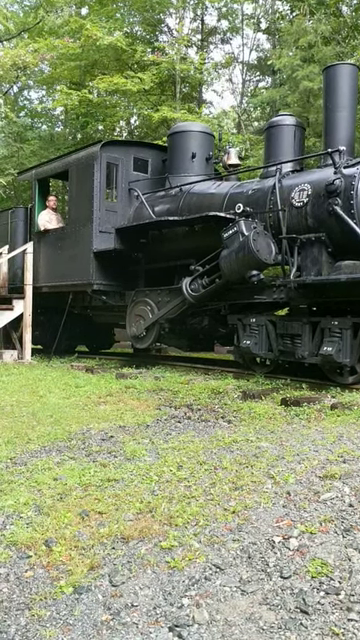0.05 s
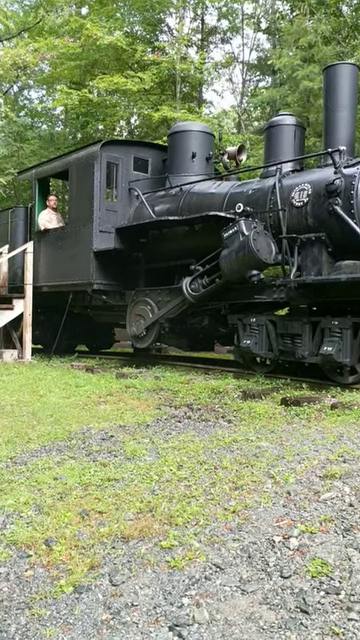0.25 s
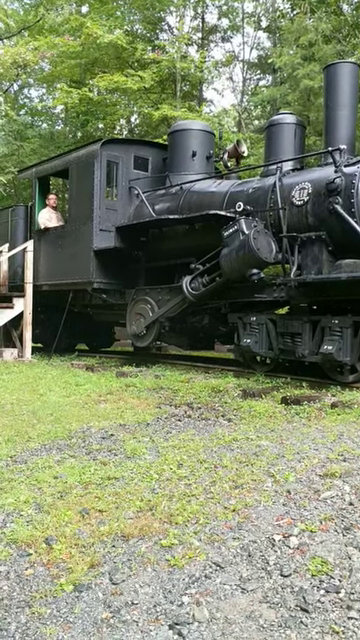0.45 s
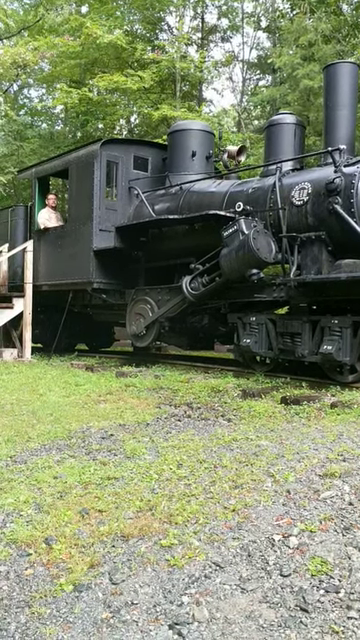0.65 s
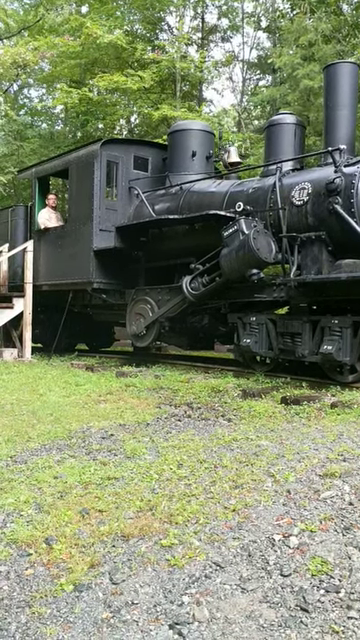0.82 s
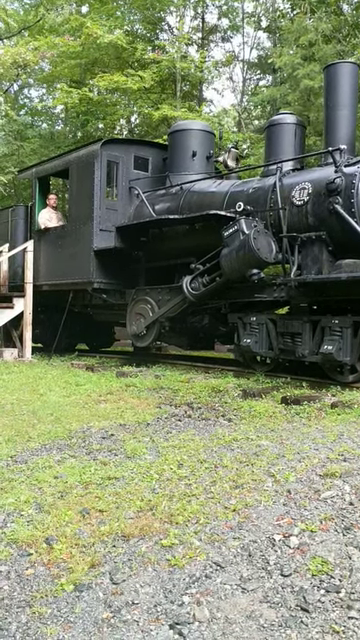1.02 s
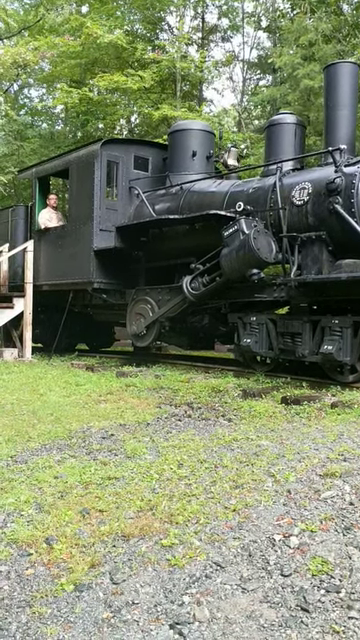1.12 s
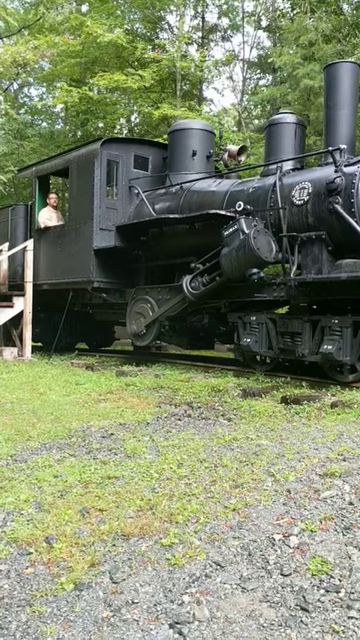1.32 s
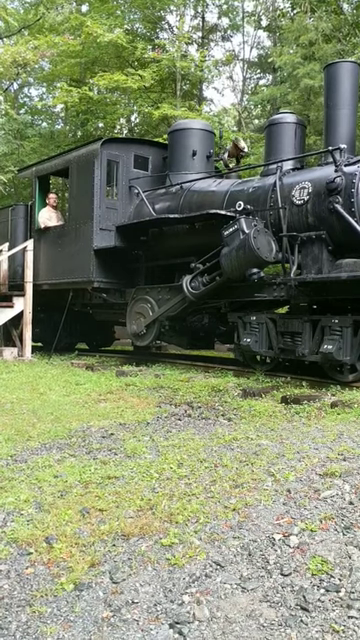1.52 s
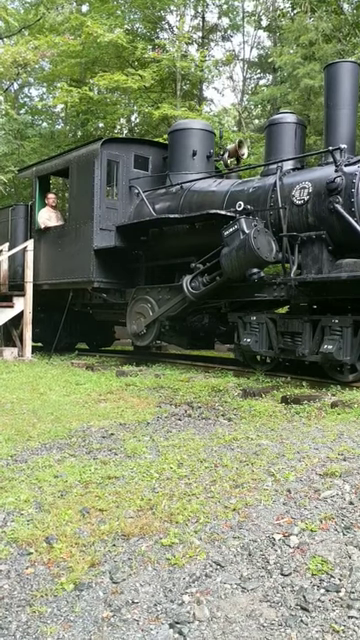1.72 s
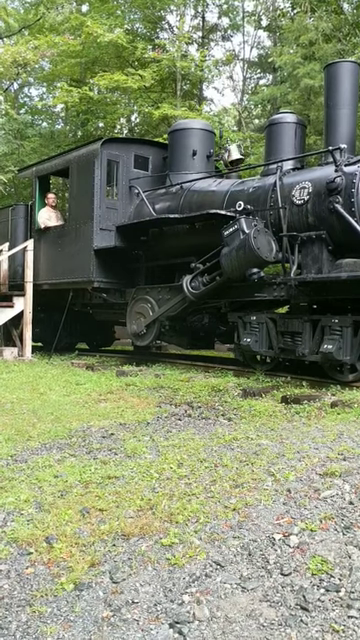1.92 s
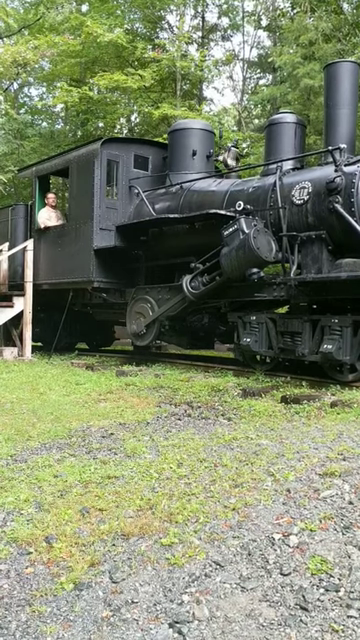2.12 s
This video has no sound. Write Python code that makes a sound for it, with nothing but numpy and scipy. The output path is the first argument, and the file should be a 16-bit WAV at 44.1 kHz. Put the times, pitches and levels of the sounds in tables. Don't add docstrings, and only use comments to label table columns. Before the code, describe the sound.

A bronze locomotive bell clangs twice, its clapper chattering on the lip as the ring wavers

```python
import sys
import numpy as np
from scipy import signal
from scipy.fft import rfft, irfft, next_fast_len
from scipy.io import wavfile
from scipy.ndimage import uniform_filter1d, map_coordinates

SR = 44100
rng = np.random.default_rng(int(sys.argv[2]) if len(sys.argv) > 2 else 0)


def store_wav(level_fs):
    pcm = np.round(np.clip(np.atleast_2d(level_fs), -1, 1) * 32767)
    wavfile.write(sys.argv[1], SR, pcm.T.astype(np.int16))


def level_to_linear(level):
    exponent = np.asarray(level, float) / 20
    return 10 ** exponent


N = 94815

BLOWS = [
    .2198,
    1.3563,
]
# start in seconds, peak level in dB.
TAPS = [(0.2191, -29.5), (0.2794, -44), (0.3452, -40), (0.38, -47), (0.3955, -45), (0.4377, -41),
        (0.468, -48), (0.5008, -43.5), (0.5255, -50.5), (0.544, -45), (0.5761, -54.5), (0.6007, -51.5),
        (0.627, -51.5), (0.6444, -49), (1.3561, -31), (1.4076, -32.5), (1.463, -41.5), (1.491, -46.5),
        (1.5253, -45), (1.554, -45), (1.5835, -55), (1.608, -60), (1.626, -47), (1.652, -52), (1.671, -52),
        (1.7084, -51)]


def along(points, hz):
    f, v = np.transpose(points)
    return np.interp(np.log(hz + 1), np.log(f + 1), v)


def unit(x):
    return x / np.sqrt(np.mean(x ** 2) + 1e-20)


def wobble(rate):
    values = rng.standard_normal(int(N * rate / SR) + 4)
    return map_coordinates(values, [np.arange(N) * rate / SR])


def filtered(x, response):
    m = next_fast_len(N + SR // 2)
    return irfft(rfft(x, m) * response(np.fft.rfftfreq(m, 1 / SR)), m)[:N]


def peaks(rows):
    return lambda f: sum(level_to_linear(db) * 1j * f * w / (c * c - f * f + 1j * f * w) for c, w, db in rows)


def bursts(events, t60):
    length = 2000
    out, t = np.zeros(N + length), np.arange(length) / SR
    noises = np.sign(rng.standard_normal((len(events), length)))
    for (s, db), noise in zip(events, noises):
        out[round(s * SR):][:length] += level_to_linear(db - 60 * t / t60) * noise
    return out[:N]


def leaves_and_steam():
    # frequency in Hz, level in dB.
    hiss_colour = [(180, -46), (300, -7.5), (1420, -7.5), (1730, -1.5), (1850, -8.5), (3510, -7.5),
                   (4500, -12), (9010, -19.5), (15500, -25)]
    hiss = filtered(rng.standard_normal(N), lambda f: level_to_linear(along(hiss_colour, f)))
    return level_to_linear(-60.5 + 0.27 * wobble(3.84)) * unit(hiss)


def cricket():
    call_hz, waver_hz, rate_hz, level_db = 8990, 40, 30, -73.5
    beat = np.pi * rate_hz * np.arange(N) / SR
    hz = call_hz + waver_hz * (np.sin(2 * beat) + 4.6 * wobble(150))
    strokes = (.3 + np.abs(np.sin(beat))) * level_to_linear(2 * wobble(200))
    return level_to_linear(level_db) * unit(strokes * np.sin(2 * np.pi * np.cumsum(hz) / SR))


def dry_ticks():
    # start in seconds, peak level in dB.
    tick_events = [(0.1759, -60), (0.188, -45.5), (0.7108, -47), (0.995, -51), (1.018, -44), (1.0739, -51),
                   (1.0898, -74.5), (1.2689, -53), (1.7918, -70), (1.9319, -52), (2.0716, -54)]
    return level_to_linear(-4.0) * filtered(bursts(tick_events, 0.0099), peaks([(12500, 9100, 0)]))


def boiler_and_yoke():
    # frequency in Hz, level in dB.
    rumble_colour = [(15, -43), (25, -33), (70, -5), (147, 0), (188, -8.5), (228, -5), (263, -13.5),
                     (379, -12), (560, -30.5), (730, -20), (1230, -120)]
    # time in seconds, level in dB.
    strain = [(0.0, -69.5), (0.24, -56.5), (0.41, -51), (0.49, -55.5), (0.74, -62), (0.96, -62),
              (1.22, -58), (1.41, -52), (1.53, -49.5), (1.84, -57), (2.15, -60.5)]
    split_hz, boiler_db, yoke_db = 91, -58.5, 2.5
    colour = lambda f: level_to_linear(along([(10, -93)] + list(rumble_colour), f))
    low = lambda f: 1 / (1 + (f / split_hz) ** 6)
    boiler = unit(filtered(rng.standard_normal(N), lambda f: colour(f) * low(f)))
    yoke = unit(filtered(rng.standard_normal(N), lambda f: colour(f) * (1 - low(f))))
    strain_db = np.interp(np.arange(N) / SR, *np.transpose(strain))
    return level_to_linear(boiler_db) * boiler + level_to_linear(yoke_db + strain_db + 1.2 * wobble(14)) * yoke


def cradle_thumps():
    # start in seconds, pitch in Hz, level in dB, time to fall 60 dB in seconds.
    thump_events = [
        (0.274, 140, -41.5, 0.3),
        (0.371, 219, -45.5, 0.22),
        (.57, 125.4, -43.5, 0.37),
        (1.037, 157.1, -40, 0.42),
        (1.04, 720, -39.5, 0.027),
        (1.364, 153, -36, 0.4),
        (1.56, 102, -34.5, 0.23),
        (1.667, 100, -43, 0.49),
        (1.831, 149, -48, 0.35),
        (2.051, 382, -57, 0.79),
    ]
    out, t = np.zeros(N), np.arange(N) / SR
    for start, hz, level_db, t60 in thump_events:
        u = np.maximum(t - start, 0)
        swell = 1 - np.exp(-u / 0.0037)
        out += level_to_linear(level_db - 60 * u / t60) * swell * np.sin(2 * np.pi * hz * u)
    return out


def clapper():
    # centre in Hz, width in Hz, level in dB.
    body = [(750, 120, -13.5), (1268, 107, 4.5), (2080, 705, 3.5), (2650, 1100, -28), (3460, 340, 0),
            (6200, 500, -7.5)]
    low_cut = lambda f: (1j * f / (550 + 1j * f)) ** 2
    high_cut = lambda f: 1 / (1 + 1j * f / 4780) ** 3
    knocks = filtered(bursts(TAPS, t60=.012), lambda f: peaks(body)(f) * low_cut(f) * high_cut(f))
    return level_to_linear(10.5 + 11.0) * knocks


def partial(row, blow, turn, leak, jolts=(), shaken=1):
    chatter_s = [
        0.34,
        0.32,
    ]
    swing_back_s = [
        .2,
        .45,
    ]
    knee_s, attack_s, jolt_s, ring_s = 0.03, 0.0012, .012, 1.14
    chatter_db, chatter_rad = .9, .2
    hz, *db, fed, damped = row
    start = round(BLOWS[blow] * SR)
    t = np.arange(min(N - start, round(ring_s * SR))) / SR
    now = t + BLOWS[blow]

    jump_db = 0
    for s, size_db in jolts:
        if s < now[0] - 1:
            continue
        jump_db = jump_db + size_db * np.clip((now - s) / jolt_s, 0, 1) * (s > BLOWS[blow] + .01)
    contacts = np.searchsorted([s for s, _ in TAPS], now)
    luck = rng.standard_normal((2, len(TAPS) + 1))[:, contacts]
    luck_db, luck_rad = uniform_filter1d(luck, size=110, axis=1)

    rest = knee_s * np.logaddexp(0, (t - chatter_s[blow]) / knee_s)
    level_db = db[blow] + fed * t + (damped - fed) * rest + jump_db + chatter_db * luck_db
    size = level_to_linear(level_db) * (1 - np.exp(-t / attack_s))
    pitch = np.interp(t, swing_back_s, hz * np.ones(2))
    phase = 2 * np.pi * np.cumsum(pitch) / SR + shaken * chatter_rad * luck_rad
    lobe = np.cos(turn(t)) + 1j * np.broadcast_to(leak, N)[start:][:len(t)]
    wave = lobe * np.exp(1j * phase)
    return np.pad(size * wave.imag, (start, N - start - len(t)))


def earlier_ring():
    # pitch in Hz, level in dB, slope in dB per second.
    leftovers = [(876, -41.5, -28), (1698, -59, -4), (2101, -65, 45), (3429, -57, -30), ]
    out, t = np.zeros(N), np.arange(N) / SR
    fade = np.clip((BLOWS[0] - t) / 0.0082, 0, 1)
    for hz, db, slope in leftovers:
        out += level_to_linear(db + slope * t + 0.75 * wobble(9)) * np.sin(2 * np.pi * hz * t) * fade
    return out


def swarm():
    # start in seconds, level in dB.
    glints = [
        (0.2218, -30),
        (.309, -34),
        (0.343, -50),
        (.467, -39),
        (0.522, -37),
        (1.3582, -26),
        (1.4077, -27),
        (1.463, -36),
        (1.493, -36),
        (1.5544, -50),
    ]
    crowd, crowd_db, tilt_db, t60 = 50, -61.5, -12, .07
    out, t = np.zeros(N + SR), np.arange(SR // 4) / SR
    hz = 5500 * 2 ** rng.uniform(0, 1.48, (crowd, 1))
    level_db = tilt_db * np.log2(hz / 6000) - 60 * t / t60 * np.sqrt(hz / 6000)
    ring = level_to_linear(level_db) * np.sin(2 * np.pi * hz * t)
    for (s, db), luck in zip(glints, rng.standard_normal((len(glints), crowd))):
        out[round(s * SR) + 40:][:len(t)] += level_to_linear(crowd_db + db + 38.5) * (luck @ ring)
    return out[:N]


def faint_partials():
    faint_hz = [3502, 5318, 5730, 6350, 6590, 7140, 7345, 8745]
    # dB after blow 1, dB after blow 2, slope in chatter and slope at rest in dB per second.
    faint = [(-33.5, -37, -46, -65), (-56, -56, 13, -65), (-82, -49, -57, -65), (-56.5, -47.5, -47, -89),
             (-63, -66, -42, -70), (-62, -51, -53, -100), (-60, -57.5, -12, -67), (-52, -48, -55, -73)]
    shimmer_hz = [5640, 6258, 8215, 8484, 8888, 9388, 9825, 10715, 10935, 11280, 11746, 12215, 12640, 12791,
                  13006, 13345, 14072, 14858, 15143]
    shimmer_db = [-67, -49, -71, -71, -58, -65, -69.5, -73, -60.5, -66, -71, -77, -71, -70.5, -65, -67, -70,
                  -78, -76]
    shimmer_slopes = [
        -41,
        -85,
    ]
    sweep_hz, leak, flicker = 5.48, 0.27, 3
    rows = [(hz, *rest) for hz, rest in zip(faint_hz, faint)]
    rows += [(hz, db, db, *shimmer_slopes) for hz, db in zip(shimmer_hz, shimmer_db)]
    out = np.zeros(N)
    for blow in range(len(BLOWS)):
        for row in rows:
            drift = np.cumsum(np.abs(1 + .5 * wobble(9.0))) / SR
            first = rng.uniform(0.099, 1)
            turn = lambda u: first + np.pi * sweep_hz * drift[:len(u)]
            out += partial(row, blow, turn, leak, shaken=flicker)
    return out


def strong_partials():
    # Hz while the mouth swings away, Hz as it swings back.
    swing_hz = [(875, 877), (1699, 1702), (2100, 2106), (2465, 2468), (3427, 3435), (3886, 3896),
                (3999, 3998), (5027, 5039), (5136, 5141), (6818, 6829)]
    # dB after blow 1, dB after blow 2, slope in chatter and slope at rest in dB per second.
    strong = [(-25.5, -23.5, -24.5, -61.5), (-25, -29.5, -38.5, -17.5), (-16.5, -19, -32, -67),
              (-48.5, -44.5, 2, -75), (-25.5, -31, -42, -50), (-36.5, -32, -28, -76),
              (-53, -39.5, -15.5, -46), (-43, -36, 3.5, -102), (-44.5, -46.5, -17.5, -62),
              (-44.5, -44.5, -9, -64)]
    # times after blow 1, times after blow 2, in seconds.
    nodes = [
        ([.44, .735, .785, 1.05], [1.52, 1.95]),
        ([.468, .64, .8, .905, 1.0, 1.185], [1.472, 1.555, 1.825, 1.94, 2.11]),
        ([.302, .54, .67, .71, .768, .93, 1.02, 1.1, 1.21], [1.402, 1.52, 1.63, 1.865, 1.94, 2.003, 2.11]),
        ([.25, .635, .86], [1.42, 1.718, 2.04]),
        ([.254, .381, .431, .633, .766, .923, 1.005, 1.15], [1.485, 1.808, 1.93, 1.988, 2.055]),
        ([.27, .39, .45, .512, .594, .625, .687, .9], [1.685, 1.92]),
        ([.29, .884, 1.07], [1.45, 2.03]),
        ([.265, .451, .497, .569, .71, .795, .86], [1.367, 1.508, 1.59, 1.651, 1.696, 1.757, 1.83, 1.946]),
        ([.272, .338, .426, .712, .796, .862], [1.397, 1.558, 1.75, 1.859, 1.986]),
        ([.237, .297, .544, .721, .837], [1.385, 1.435, 1.49, 1.748, 1.795, 1.84]),
    ]
    leaks = [.06, .1, .18, .12, .15, .2, .25, .15, .15, .2]
    beside = [
        [1.95],
        [.8, .905, 1.555],
        [.71, 1.865, 1.94],
        [],
        [.633, 2.055],
        [.27, .512, .69],
        [1.45],
        [1.696, 1.757],
        [],
        [.237, .544],
    ]
    # time in seconds, jump in dB.
    jolts = [
        [(.28, -1.5), (.345, -10), (.46, 12), (.56, -6.5), (.62, 5.5), (.71, -8.5), (1.42, -1.5), (1.54, 4),
         (1.61, -5.5), (1.65, 5), (1.74, -2), (1.8, 4), (1.92, -9.5)],
        [(.25, -10), (.285, 10.5), (.36, -2), (.5, 1.5), (.55, -5.5), (.7, 3.5), (1.06, -5.5), (1.2, 4.5),
         (1.41, -2.5), (1.48, 0.5), (1.57, 13.5), (1.63, -4), (1.78, -6.5), (1.95, 1), (2.03, 4.5)],
        [(.31, 3.5), (.385, -6.5), (.405, -9), (.55, 7), (.78, 1.5), (.89, -1), (1.46, -13), (1.54, 5),
         (1.64, 9), (1.675, -6), (1.695, 1), (1.735, -4), (1.76, 7), (1.87, 4.5), (1.91, -5)],
        [(.55, 13), (.7, -7), (1.6, 4.5)],
        [(.279, 4), (.385, -6.5), (.44, 12), (.53, -3), (.58, 1.5), (.66, -2), (.78, 8), (.84, -9), (.93, 5),
         (1.375, 4), (1.41, 11), (1.49, -3.5), (1.64, -2.5), (1.94, 3)],
        [(.28, 4), (.39, -13.5), (.52, 14), (.7, -2.5), (1.4, 6.5), (1.44, -1.5), (1.57, -3), (1.77, -5)],
        [(.34, 12), (.7, 1), (1.46, 2), (1.67, -6)],
        [(.58, 11.5), (.72, 2), (1.39, 4), (1.44, -3.5), (1.56, -16), (1.71, 3), (1.76, 8.5), (1.84, 3)],
        [(.28, -12.5), (.35, 8), (.44, 8.5), (1.57, 8), (1.64, -9)],
        [(.3, 4), (.37, -8), (.44, 8.5), (.63, -7), (.73, 3), (1.39, -5), (1.44, 3), (1.5, 2), (1.61, -6),
         (1.85, 4.5)],
    ]
    out, t = np.zeros(N), np.arange(N) / SR
    for blow, start in enumerate(BLOWS):
        for i, row in enumerate(strong):
            shallow = sum(np.exp(-((t - s) / .03) ** 2) for s in beside[i])
            leak = leaks[i] + .3 * shallow
            times = np.array(nodes[i][blow]) - start
            moments = np.r_[0, times, times[-1] + .12]
            halves = np.r_[0, np.arange(len(times)) + .5, len(times)]
            turn = lambda u: np.pi * np.interp(u, moments, halves)
            out += partial((np.array(swing_hz[i]), *row), blow, turn, leak, jolts[i])
    return out


def bell():
    return strong_partials() + faint_partials() + earlier_ring() + swarm()


def trees(x):
    # frequency in Hz, time to fall 60 dB in seconds.
    echo_t60 = [(300, 1), (2000, 1), (10000, 0.27)]
    hz, t, z = signal.stft(rng.standard_normal(SR // 2), SR, nperseg=256)
    fading = z * level_to_linear(-60 * t / along(echo_t60, hz)[:, None])
    tail = signal.istft(fading, SR, nperseg=256)[1]
    late = np.pad(x, (300, 0))
    return signal.fftconvolve(late, tail / np.linalg.norm(tail))[:N]


def scene():
    clearing = leaves_and_steam() + cricket() + dry_ticks()
    cradle = boiler_and_yoke() + cradle_thumps()
    taps, ring = clapper(), bell()
    echo = trees(level_to_linear(-27) * ring + level_to_linear(-8) * taps)
    return (ring + taps + echo + cradle + clearing)[None]


def top_cut(x):
    return signal.sosfilt(signal.butter(12, 15680, fs=SR, output="sos"), x)


def record(dry):
    limited = filtered(dry[0], lambda f: f < 15650)[None]
    return top_cut(limited)


dry = scene()
out = record(dry)
store_wav(out)
```